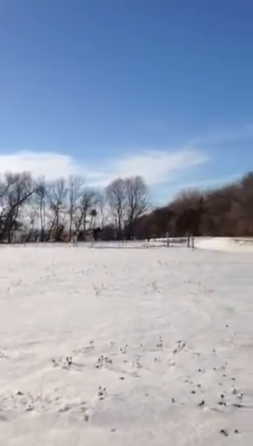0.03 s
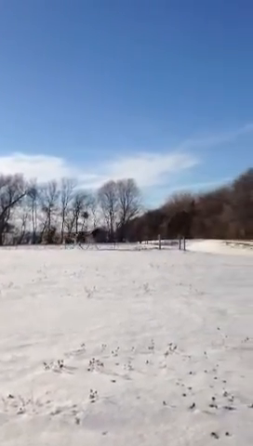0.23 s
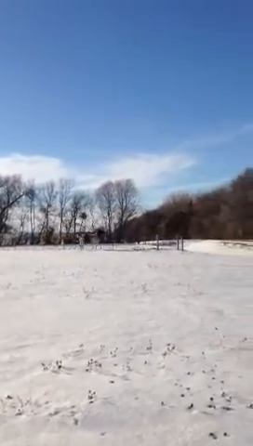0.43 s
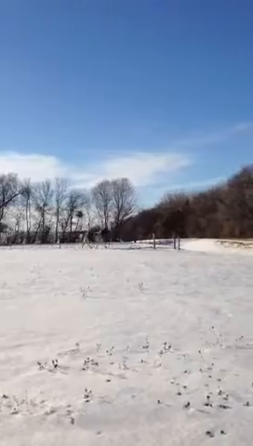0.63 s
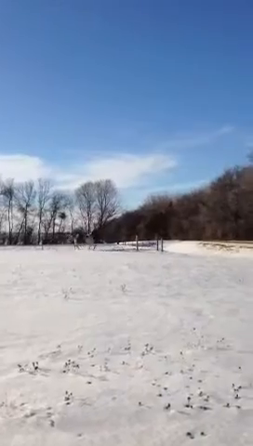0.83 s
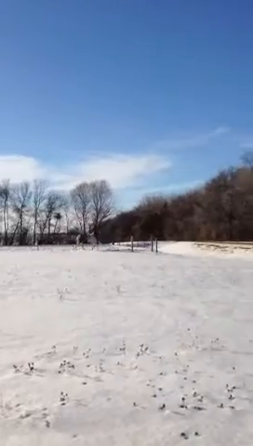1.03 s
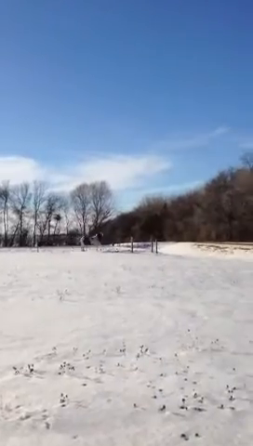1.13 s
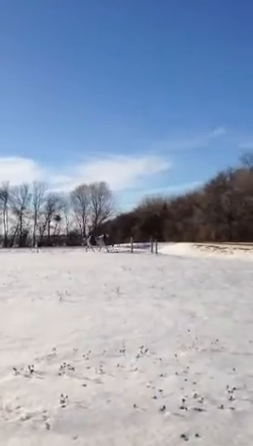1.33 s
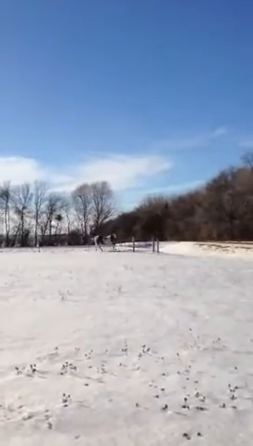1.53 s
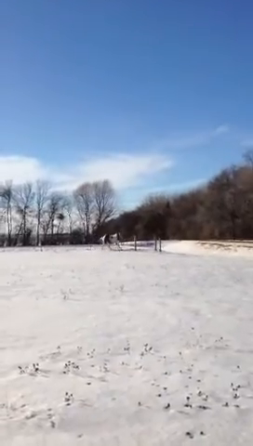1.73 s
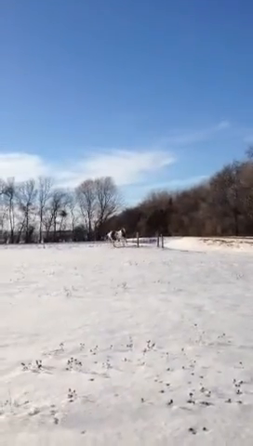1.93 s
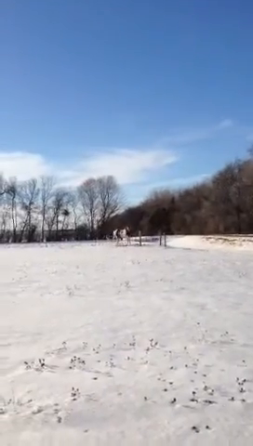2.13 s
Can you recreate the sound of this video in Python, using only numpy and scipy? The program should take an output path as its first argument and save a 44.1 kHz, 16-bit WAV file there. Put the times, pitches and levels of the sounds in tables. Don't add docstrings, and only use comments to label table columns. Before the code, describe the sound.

Quiet light wind and microphone hiss. At about 0.15 seconds a horse starts a whinny with a short growl, leaping into a high, nasal squeal by 0.3, held nearly level with a low buzzing tone beneath. It slips at 0.5, drops slightly and cracks around 0.8-1.1, roughens, then from 1.3 collapses into breathy, slowing growl pulses fading by 1.9. Faint tree echo; tiny snow creaks after 2.1.

```python
import sys
import numpy as np
from scipy import signal
from scipy.io import wavfile
from scipy.ndimage import uniform_filter1d

SR = 44100
rng = np.random.default_rng(int(sys.argv[2]) if len(sys.argv) > 2 else 0)


def volts_from_db(level):
    exponent = np.asarray(level, float) / 20
    return 10 ** exponent


def unload_wav(signal):
    wavfile.write(
        sys.argv[1],
        SR,
        np.round(np.clip(np.atleast_2d(signal).T, -1, 1) * 32767).astype(np.int16),
    )


N = 97020
PITCH_WOBBLE = 0.00417


# (time [s], pitch [Hz], level [dB], brightness [dB], tilt of side lines, upper up and lower down [dB],
# nostril flare [dB])
SQUEAL_PATH = [(.19, 1470, -54.5, -3, 5, 3), (.212, 1600, -49, -3.5, 7.5, -5),
               (.236, 1676, -48, -8, -1.5, -11), (.244, 1695, -42, -6.5, -7.5, -8),
               (.274, 1751, -40.5, -3.5, 2, 0), (.348, 1866, -40.5, -1.5, 2.5, -5),
               (.43, 1885, -43, 2, 6.5, 4.5), (.468, 1850, -41, 4.5, -1.5, -8),
               (.528, 1885, -39.5, 3, 4.5, -2), (.648, 1892, -41.5, 6.5, 4.5, -4),
               (.736, 1855, -42.5, 6, 1, 0), (.804, 1821, -44, 11, -3, -2), (.822, 1800, -45.5, 8, 3, 12),
               (.834, 1678, -43, 8.5, -0.5, -0.5), (.896, 1656, -43.5, 7.5, -0.5, 2),
               (.934, 1699, -39, 3.5, -1, 4), (.95, 1826, -48, 14, 7, 1.5), (.99, 1710, -42.5, 2, 2, 3),
               (1.036, 1703, -38.5, -6, -3, 4.5), (1.06, 1819, -43, 4.5, 0, 9),
               (1.085, 1765, -41.5, -12.5, -7, 14), (1.116, 1721, -38.5, -22.5, -6, 18),
               (1.142, 1781, -40.5, -7.5, -5, 8), (1.17, 1705, -35, -24, -9, 2),
               (1.218, 1587, -39, -8.5, -8, -5), (1.27, 1654, -36, -16.5, -4.5, -1),
               (1.304, 1630, -36.5, -10, -8.5, -16), (1.32, 1634, -56, 0, -7, 5)]
# (middle [s], length [s], drop [Hz], roughness [0-1])
SQUEAL_SLIPS = [
    (.225, .08, 5, .6),
    (.29, .06, 5, .3),
    (.497, .046, 160, .2),
    (.665, .04, 15, .3),
    (1.015, .085, 5, .75),
    (1.085, .035, 5, .3),
    (1.22, .16, 5, .25),
]
# (time [s], pitch [Hz], level [dB])
LOW_TONE_PATH = [(.21, 386.3, -60.5), (.246, 407, -52.5), (.312, 499.6, -47), (.438, 533.7, -46.5),
                 (.556, 537.7, -47), (.664, 504.8, -46), (.71, 514.9, -46.5), (.954, 514.3, -49),
                 (1.04, 469.1, -44.5), (1.07, 435.3, -46.5), (1.15, 443.2, -46), (1.2, 418.3, -47),
                 (1.255, 464, -46.5), (1.286, 448, -46.5), (1.302, 380, -49)]


def whinny():
    t = np.arange(N) / SR
    high_hz, high_db, bright_db, tilt_db, flare_db, high_on = track(SQUEAL_PATH)
    low_hz, low_db, low_on = track(LOW_TONE_PATH)
    rough = np.zeros(N)
    for mid_s, length_s, drop_hz, roughness in SQUEAL_SLIPS:
        slip = bump(t, mid_s, length_s)
        high_hz = high_hz - drop_hz * slip
        rough += roughness * slip
    high_wander = PITCH_WOBBLE * chance(46.0) + 0.01 * rough * chance(370)
    low_wander = PITCH_WOBBLE * chance(38) + 0.021 * rough * chance(180)
    high_phase = phase(high_hz * (1 + high_wander))
    low_phase = phase(low_hz * (1 + low_wander))
    grip = np.minimum(volts_from_db(low_db + 54), 1) * low_on

    voice = high_on * squeal(high_phase, low_phase, high_db, bright_db, tilt_db, flare_db, rough, grip)
    voice += low_on * low_tone(low_phase, low_db) + lingering_mode()
    air_flow = high_on * breath(low_phase, high_db + 0.24 * bright_db + 1.5 * rough)
    nostril_db = high_db + 0.45 * bright_db + 3 * rough + 0.56 * flare_db
    return throat(np.sqrt(2) * voice + air_flow) + high_on * hiss(nostril_db)


FLUTTER_DB = 2.5
SIDE_LINES_DB = [
    [-40, -41, -22.5, -0.5, -8, -11.5, -14.5, -31.5, -24, -27.5],
    [-45, -28, -29, -7.5, -10.5, -15.5, -11, -44, -53, -47],
    [-23.5, -22, -17.5, -17, -22.5, -45, -34, -34, -33, -42],
    [-43, -40, -27, -32, -39, -30, -35, -33, -40, -42],
]


def squeal(high_phase, low_phase, high_db, bright_db, tilt_db, flare_db, rough, grip):
    fuzz, steady, lift_db = .3, .35, 7.5
    halves = 1 + rough * (1.3 * np.cos(low_phase / 2) + 1.1 * chance(540))
    out = np.zeros(N)
    for overtone, row in enumerate(SIDE_LINES_DB, 1):
        for step, line_db in enumerate(row, -3):
            main = overtone == 1 and step == 0
            db = high_db + line_db + tilt_db * np.sign(step)
            db = db + FLUTTER_DB * chance(12.8) * (steady if main else 1)
            db = db + bright_db * (overtone > 1) + flare_db * (overtone > 2)
            db = db + lift_db * rough * (7 * overtone + 2 * step > 17)
            line = volts_from_db(db) * np.cos(overtone * high_phase + step * low_phase + random_phase())
            if overtone == 1 and step == 1:
                line = line * side_shiver()
            if main:
                out += line * (1 + (fuzz * 0.5 + 0.44 * rough) * chance(176))
            else:
                out += line * grip * (halves + fuzz * chance(405))
    return out


LOW_TONE_OVERTONES_DB = [-1, -5.5, -15, -10, -13, -13.5, -41, -18]


def low_tone(low_phase, low_db):
    out = np.zeros(N)
    for overtone, overtone_db in enumerate(LOW_TONE_OVERTONES_DB, 1):
        level = volts_from_db(low_db + overtone_db + FLUTTER_DB * chance(37.3))
        beat = shiver(mid_s=.68, length_s=.07, rate_hz=32, depth=.7)
        out += beat * level * np.cos(overtone * low_phase + random_phase())
    return out


def lingering_mode():
    held = bump(np.arange(N) / SR, mid_s=1, length_s=0.16) * side_shiver()
    return volts_from_db(-51) * held * np.cos(phase(2371 * (1 + PITCH_WOBBLE * chance(29))))


def shiver(mid_s, length_s, rate_hz, depth):
    beat = np.cos(phase(rate_hz * (1 + 0.22 * chance(14.7))))
    return 1 + depth * bump(np.arange(N) / SR, mid_s, length_s) * beat


def side_shiver():
    return shiver(mid_s=.78, length_s=.26, rate_hz=48, depth=.8)


def breath(low_phase, db):
    level_db, patch_db, top_hz = 1.5, 3, 5600
    puffs = signal.lfilter([1, -.9], [1], rng.standard_normal(N)) * (1 + .5 * np.cos(low_phase))
    puffs = signal.sosfilt(signal.butter(4, top_hz, fs=SR, output="sos"), puffs)
    return volts_from_db(db + level_db + patch_db * chance(9.3)) * puffs


# (time [s], pulse rate [Hz], level [dB], ring of the dying squeal [dB], top band [dB])
OPENING_GROWL = [
    (.136, 112, -82, -2, -8),
    (.153, 130, -55.5, -15, -6),
    (.2, 148, -46.5, 7, 5.5),
    (.24, 180, -52.5, 14, 2),
    (.3, 780, -57.5, 0, 5),
]
CLOSING_GROWL = [(1.27, 170.4, -73, 10, 3), (1.315, 159.9, -44.5, 9, -4.5), (1.352, 155.2, -42, 11.5, 2.5),
                 (1.38, 150.2, -47, 20.5, 0.5), (1.405, 139.7, -44, 13.5, 4.5),
                 (1.43, 127.3, -43.5, -1, -1.5), (1.48, 118, -45.5, 3.5, 0), (1.52, 110, -45.5, 8.5, -2.5),
                 (1.565, 97, -50, -3, 3.5), (1.61, 94.74, -47, -13, -9.5), (1.655, 94.1, -50.5, -19, 4),
                 (1.675, 92.2, -55.5, -8, 7.5), (1.71, 90.8, -61.5, -12, 0.5), (1.97, 89.9, -76.5, -15, 6)]
# (frequency [Hz], width [Hz], level [dB])
CHEST_MODES = [(435, 105, 7), (547, 130, 6.5), (1070, 62, 6)]


def growl(path):
    rate_jitter, noise_share, click_spread_db = .1, .76, 1.5
    puff_floor, puff_decay_cycles = .18, .35
    throb_db, throb_s, throb_peak_s = 1.5, .088, 1.395
    low_hz, top_hz, ring_hz, ring_width_hz, ring_gain_db = 254, 2700, 1630, 115, 3
    mode_drift = .05
    rate_hz, db, ring_db, top_db, on = track(path)
    turns = np.cumsum(rate_hz * np.exp(rate_jitter * chance(60.26))) / SR
    clicks = np.diff(np.floor(turns), prepend=0) * volts_from_db(click_spread_db * chance(110))
    clicks = uniform_filter1d(clicks, size=5)
    puffs = (puff_floor + np.exp(-(turns % 1) / puff_decay_cycles)) * rng.standard_normal(N)
    throb = volts_from_db(throb_db * np.cos(2 * np.pi * (np.arange(N) / SR - throb_peak_s) / throb_s))

    drive = (1 - noise_share) * evened(clicks) + noise_share * evened(puffs)
    drive = signal.lfilter([1], [1, -.7], drive) * throb
    drive = signal.sosfilt(signal.butter(2, low_hz, "highpass", fs=SR, output="sos"), drive)
    body = drive.copy()
    for hz, width_hz, mode_db in CHEST_MODES:
        body += volts_from_db(mode_db) * resonate(drive, hz * (1 + mode_drift * chance(18)), width_hz)
    ring = resonate(drive, ring_hz * (1 + mode_drift / 2 * chance(9.9)), ring_width_hz)
    ring = volts_from_db(ring_gain_db + ring_db) * ring
    top = signal.sosfiltfilt(signal.butter(3, top_hz, "highpass", fs=SR, output="sos"), body)
    voice = volts_from_db(db) * (body + (volts_from_db(top_db) - 1) * top + ring) / np.std(body)
    return on * (throat(voice, stretch=1.0325) + throb * hiss(db + top_db - 2.0))


# (frequency [Hz], level [dB])
THROAT_COLOUR = [(100, -2.5), (450, -3), (1300, 3), (1750, 6), (2300, 5), (3600, 6.5), (5200, -8.5),
                 (12000, -15)]
# (frequency [Hz], width [Hz], level [dB])
NARROW_GAPS = [(2107, 51, -4), (2664, 163.5, -34), (3475, 160, 1.5), (5300, 167, -18), (5760, 110, -12)]


def throat(x, stretch=1):
    hz = abs(np.fft.fftfreq(8192, 1 / SR)) * stretch
    db = read(THROAT_COLOUR, hz)
    for gap_hz, width_hz, gap_db in NARROW_GAPS:
        db = db + gap_db * np.exp(-((hz - gap_hz) / width_hz) ** 2)
    spectrum = np.exp(signal.hilbert(np.log(volts_from_db(db))).conj())
    return signal.oaconvolve(x, np.fft.ifft(spectrum).real[:2048])[:N]


# (frequency [Hz], width [Hz], level [dB])
NOSTRIL_BANDS = [(5680, 360, 4.5), (7035, 216, 6.5), (8540, 2900, -5)]


def hiss(db):
    level_db, patch_db, patch_hz = -21.5, 3., 12
    flow = rng.standard_normal(N)
    bands = np.zeros(N)
    for hz, width_hz, band_db in NOSTRIL_BANDS:
        bands += volts_from_db(band_db + patch_db * chance(patch_hz)) * resonate_twice(flow, hz, width_hz)
    return volts_from_db(db + level_db) * evened(bands)


def trees(x):
    level_db, t60_s, first_return_s = -28, 1.18, 0.057
    t = np.arange(SR) / SR
    sparse = rng.standard_normal(SR) * (rng.random(SR) < .05)
    tail = sparse * volts_from_db(-60 * t / t60_s) * (t > first_return_s)
    tail = signal.lfilter([1], [1, -.5], tail)
    return volts_from_db(level_db) * signal.fftconvolve(x, tail / np.linalg.norm(tail))[:N]


# (start [s], rise [s], frequency [Hz], width [Hz], level [dB])
SNOW_CREAKS = [
    (2.135, 0.016, 4630, 246, -69.5),
    (2.149, 0.0037, 4050, 249, -71),
    (2.17, .02, 5100, 250, -69),
    (2.172, 0.01, 980, 152, -63),
]


def snow():
    t, out = np.arange(N) / SR, np.zeros(N)
    for start_s, rise_s, hz, width_hz, db in SNOW_CREAKS:
        squeak = evened(resonate_twice(rng.standard_normal(N), hz, width_hz))
        out += volts_from_db(db) * np.clip((t - start_s) / rise_s, 0, 1) * squeak
    return out


# (frequency [Hz], level [dB per Hz])
AIR_SPECTRUM = [(24, -45), (40, -40), (160, -6), (233, -9), (466, -15.5), (568, -18), (1080, -26.5),
                (2640, -24), (15000, -29)]


def air():
    level_db, lump_db, lump_top_hz = -63, 4.8, 400
    frames, hz = N // 256 + 5, np.fft.rfftfreq(1024, 1 / SR)[:, None]
    real, imag = rng.standard_normal((frames, 513, 2)).T
    lumps = evened(uniform_filter1d(rng.standard_normal(frames), 5))
    db = read(AIR_SPECTRUM, hz) + lump_db * lumps / (1 + (hz / lump_top_hz) ** 2)
    noise = signal.istft((real + 1j * imag) * volts_from_db(db), nperseg=1024, noverlap=768)[1][:N]
    return volts_from_db(level_db) * evened(noise)


def evened(x):
    return x / np.sqrt(np.mean(x ** 2) + 1e-20)


def read(points, hz):
    f, value = np.transpose(points)
    return np.interp(np.log(hz + 1), np.log(f + 1), value)


def track(table):
    t, rows = np.arange(N) / SR, np.transpose(table)
    live = (t > rows[0, 0]) & (t < rows[0, -1])
    return [np.interp(t, rows[0], column) for column in rows[1:]] + [live]


def bump(t, mid_s, length_s):
    return np.exp(-((t - mid_s) / (length_s / 2)) ** 4)


def phase(hz):
    return 2 * np.pi * np.cumsum(hz) / SR


def random_phase():
    return 2 * np.pi * rng.random()


def chance(hz):
    step = 16
    low_pass = signal.butter(2, hz, fs=SR / step, output="sos")
    slow = signal.sosfiltfilt(low_pass, rng.standard_normal(N // step + 2))
    return np.interp(np.arange(N) / step, np.arange(len(slow)), evened(slow))


def resonate(x, hz, width_hz):
    turn = np.exp(1j * phase(hz * np.ones(N)))
    r = np.exp(-np.pi * width_hz / SR)
    return 2 * (turn * signal.lfilter([1 - r], [1, -r], x / turn)).real


def resonate_twice(x, hz, width_hz):
    return resonate(resonate(x, hz, width_hz), hz, width_hz)


def masked(x):
    mask_db, hole_db = -26, -25
    z = signal.stft(x, nperseg=2048)[2]
    power = abs(z) ** 2 + 1e-20
    near = uniform_filter1d(power, size=7, axis=1)
    wide = uniform_filter1d(power, size=91, axis=1)
    gain = np.where(near < wide * volts_from_db(2 * mask_db), volts_from_db(hole_db), 1)
    return signal.istft(z * gain, nperseg=2048)[1][:, :N]


def scene():
    horse = whinny() + growl(OPENING_GROWL) + growl(CLOSING_GROWL)
    return (horse + trees(horse) + snow() + air())[None]


def roll_off(x):
    return signal.sosfilt(signal.butter(12, 15420, fs=SR, output="sos"), x)


def record(dry):
    mic_hz, edge_hz = 110, 15500
    x = signal.sosfilt(signal.butter(2, mic_hz, "highpass", fs=SR, output="sos"), dry)
    band_limit = signal.firwin(511, edge_hz, window=("kaiser", 9), fs=SR)[None]
    x = signal.oaconvolve(masked(x), band_limit, "same")
    return roll_off(x)


dry = scene()
out = record(dry)
unload_wav(out)
```